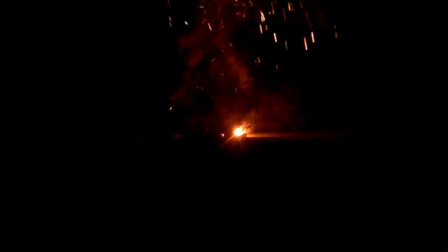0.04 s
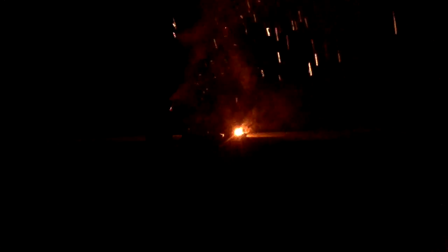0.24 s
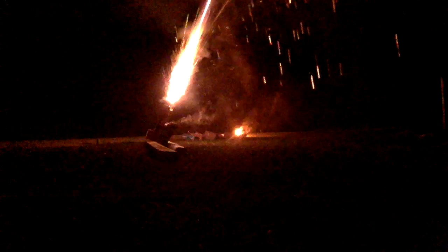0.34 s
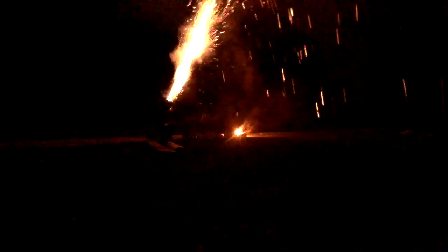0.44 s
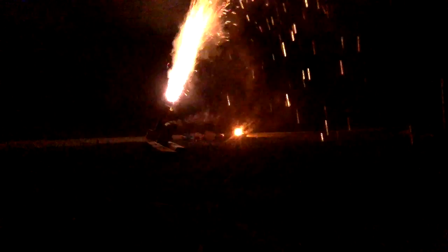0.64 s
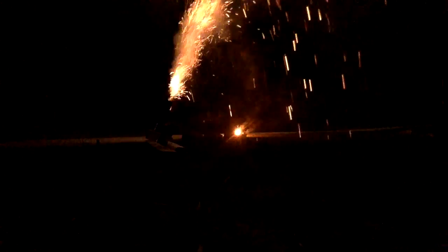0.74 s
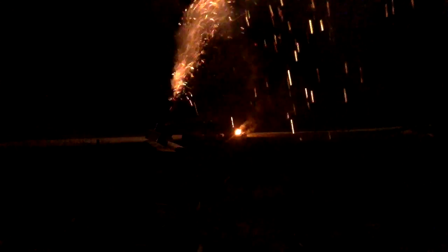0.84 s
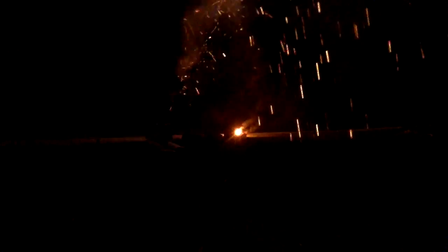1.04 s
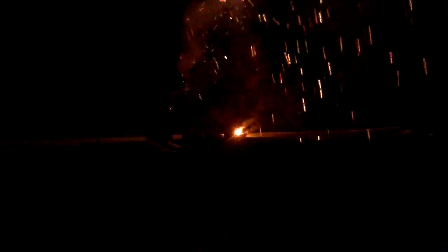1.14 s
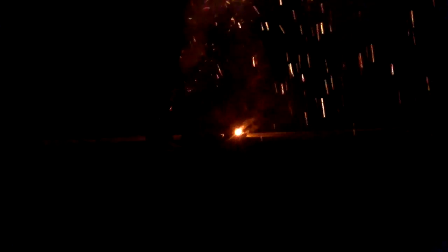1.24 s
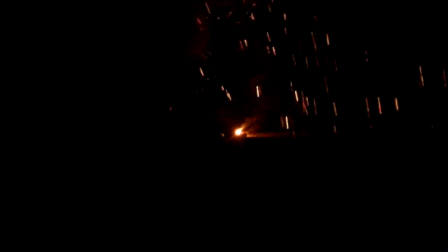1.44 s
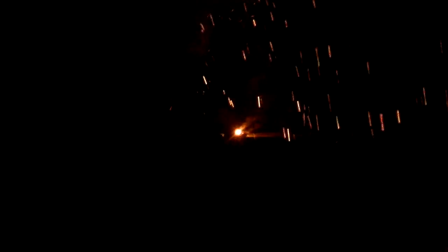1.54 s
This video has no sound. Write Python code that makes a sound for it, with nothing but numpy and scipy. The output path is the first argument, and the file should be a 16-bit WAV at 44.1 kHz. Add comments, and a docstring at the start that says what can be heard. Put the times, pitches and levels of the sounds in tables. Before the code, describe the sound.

A ground firework crackles outdoors, starting with a few sharp pops. At about 0.3 seconds a volley of cracks and a dull thump start a hissing jet of flame. Another thump comes at 0.5 seconds, a smaller one just after. The densest, loudest popping runs from 0.7 to 0.9 seconds, overloading the microphone. Lighter crackle follows from 1.1 to 1.35, and the hiss fizzles out around 1.5 seconds.

```python
"""A ground firework burns outdoors at night, its sparks bursting singly and in volleys of tiny blasts. Its tube
rings with two dull thumps and a smaller one, each with a short bark; two faint low thuds sound like distant
echoes. A jet of flame, gas noise with crackling powder grains in it, rushes up and fizzles out. The blasts
scatter from the ground and surroundings, and the loudest are flattened at full level."""
import sys
import numpy as np
from scipy import signal
from scipy.fft import rfft, irfft
from scipy.io import wavfile

SR = 44100
rng = np.random.default_rng(int(sys.argv[2]) if len(sys.argv) > 2 else 0)


def file_out(sig):
    """Save sig as 16-bit WAV at sys.argv[1]."""
    # one column per channel
    cols = np.atleast_2d(sig).T
    # limit, then scale
    lim = np.clip(cols, -1, 1)
    pcm = np.round(lim * 32767).astype(np.int16)
    wavfile.write(sys.argv[1], SR, pcm)


N = 70560
TIME = np.arange(N) / SR

# envelopes of the flame's three noise bands: t/s, roar level/dB, rush level/dB, sizzle level/dB
JET_LEVELS = [(0, -80, -79, -84), (.018, -78, -64, -76), (.032, -56, -52, -52), (0.068, -83, -58.5, -56),
              (.14, -67, -50.5, -46.5), (.18, -52, -53.5, -49), (.25, -72, -42.5, -38.5),
              (.33, -28.5, -29.5, -31), (.44, -38.5, -31.5, -35), (.61, -32.5, -35.5, -41),
              (.69, -45, -36, -37.5), (.74, -29.5, -26.5, -34.5), (.82, -35, -21.5, -28),
              (.89, -50, -20.5, -27.5), (0.979, -31.5, -22.5, -25.5), (1.1, -47, -29, -42),
              (1.16, -41, -32, -32.5), (1.28, -50, -32.5, -33), (1.38, -53, -36.5, -40.5),
              (1.443, -57, -38, -39), (1.5, -63.5, -48.5, -60), (1.6, -67, -54.5, -62)]


def from_db(db):
    """Amplitude ratio of a level in decibels."""
    return 10 ** (np.asarray(db) / 20)


def rms_one(x):
    """Normalisation to unit RMS amplitude."""
    return x / np.sqrt(np.mean(x ** 2) + 1e-20)


def cut(x, hz, kind="low", order=2):
    """Butterworth filter: attenuation beyond a corner frequency."""
    return signal.sosfilt(signal.butter(order, hz, kind, fs=SR, output="sos"), x + 1e-18)


def resonance(x, hz, width_hz):
    """Damped resonator with unit gain at its peak."""
    radius = np.exp(-np.pi * width_hz / SR)
    feedback = [1, -2 * radius * np.cos(2 * np.pi * hz / SR), radius ** 2]
    return signal.lfilter(np.array([1, 0, -1]) * (1 - radius ** 2) / 2, feedback, x + 1e-18)


def add(out, s, sound):
    """Superposition of a sound that begins at s seconds."""
    start = round(s * SR)
    out[start:start + len(sound)] += sound[:N - start]


def shaped(x, spectrum):
    """Spectral weighting, interpolated over log frequency; unit RMS."""
    hz, db = np.transpose(spectrum)
    bins = np.maximum(np.fft.rfftfreq(N, 1 / SR), 1)
    gain = from_db(np.interp(np.log(bins), np.log(hz), db))
    return rms_one(irfft(rfft(x) * gain, N))


def band_noise(hz, width_hz):
    """White noise filtered by two like resonators in cascade; unit RMS."""
    once = resonance(rng.standard_normal(N), hz, width_hz)
    return rms_one(resonance(once, hz, width_hz))


def swell(peak_s, width_s):
    """Gaussian envelope of unit height."""
    return np.exp(-0.5 * ((TIME - peak_s) / width_s) ** 2)


def scatter(x, t60, gap_s):
    """Diffuse reflection: convolution with a delayed, exponentially decaying noise of unit energy."""
    t = TIME[:len(x)]
    tail = rng.standard_normal(len(x)) * from_db(-60 * t / t60) * (t > gap_s)
    return signal.fftconvolve(x, tail / np.sqrt(np.sum(tail ** 2) + 1e-20))[:len(x)]


def blast(spike_ms):
    """Friedlander blast wave: sudden overpressure lasting spike_ms, then a longer, weaker suction."""
    t = TIME[:SR // 40]
    return np.diff(t * np.exp(-1000 * t / spike_ms), prepend=0) * SR


def burning(grains_per_s=2500, grain_db=-9, spread_db=9, flicker_db=2.07, flicker_hz=63):
    """Combustion noise: gas noise plus the shot noise of powder grains, randomly amplitude-modulated."""
    grains = (rng.random(N) < grains_per_s / SR) * rng.choice([-1, 1], N)
    sizes = from_db(spread_db * np.minimum(rng.exponential(1, N), 5))
    noise = rng.standard_normal(N) + from_db(grain_db) * rms_one(grains * sizes)
    flicker = rms_one(cut(rng.standard_normal(2 * N), flicker_hz)[N:])
    return noise * from_db(flicker_db * flicker)


def jet():
    """Jet noise: the flame roars, rushes and sizzles in three bands, and spits once before it builds."""
    # relative spectral densities of the bass, middle and treble bands: f/Hz, level/dB
    roar_spectrum = [(30, -23.5), (100, -10), (200, -6), (320, 2.5), (520, -9.5), (800, -20), (1500, -40)]
    rush_spectrum = [(300, -30), (600, -4.5), (900, -4), (1350, -0.5), (2200, -5), (3000, -3.5), (4800, -4),
                     (6300, -3.5), (9000, -18), (15000, -44.5)]
    sizzle_spectrum = [(2500, -66), (5000, -14), (6500, -2.5), (7500, 2.5), (9500, -3), (12000, -9.5),
                       (15500, -17)]
    bands = [shaped(burning(), spectrum) for spectrum in (roar_spectrum, rush_spectrum, sizzle_spectrum)]
    s, *levels = np.transpose(JET_LEVELS)
    flame = sum(from_db(np.interp(TIME, s, db)) * band for db, band in zip(levels, bands))
    roar, rush, sizzle = bands
    spit = from_db(-51) * roar + from_db(-42) * rush + from_db(-35.5) * sizzle
    return flame + swell(peak_s=0.092, width_s=0.0069) * spit


def specks(per_s=130, above_sizzle_db=2.5, spread_db=7):
    """Poisson process: tiny sparks tick at random, louder as the jet sizzles more."""
    s, _, _, sizzle_db = np.transpose(JET_LEVELS)
    sizes = from_db(np.interp(TIME, s, sizzle_db) + above_sizzle_db + spread_db * rng.standard_normal(N))
    ticks = sizes * (rng.random(N) < per_s / SR)
    return signal.fftconvolve(ticks, blast(spike_ms=0.034))[:N]


def sparks(jitter_s=0.00005, ground_lag_s=0.00066, lag_spread=0.2, heavy_ms=0.07, heavy_range_ms=0.0045):
    """Interference: each spark's blast meets its ground reflection, with a delay set by its place."""
    # bursting sparks: t/s, level/dB, duration of the overpressure/ms
    bursts = [(0.0266, -5, 0.067), (0.1333, 9.5, 0.046), (0.213, 5.5, 0.033), (0.2193, 7.5, 0.046),
              (0.2342, -8, 0.053), (0.25, 10, 0.023), (0.2532, 6.5, 0.063), (0.258, 5, 0.041),
              (0.2723, 10, 0.047), (0.277, 18, 0.027), (0.2778, 7.5, 0.062), (0.2799, 12, 0.037),
              (0.2837, 12.5, 0.03), (0.2863, -2, 0.061), (0.2862, 20, 0.064), (0.2879, 9.5, 0.08),
              (0.2954, 14.5, 0.072), (0.3242, 1.5, 0.039), (0.344, -3, 0.036), (0.3471, -3, 0.026),
              (0.3501, 6.0, 0.039), (0.3562, 4, 0.053), (0.3778, 3, 0.053), (0.3816, 6.5, 0.05),
              (0.4034, 7, 0.056), (0.4084, 4, 0.041), (0.4629, -4, 0.035), (0.4709, 5, 0.041),
              (0.4808, 14, 0.045), (0.4923, -11, 0.062), (0.5875, 19, 0.025), (0.6336, 13.5, 0.075),
              (0.6481, 14, 0.062), (0.6546, 11.5, 0.097), (0.6612, 14.5, 0.074), (0.7052, 11.5, 0.08),
              (0.7128, 14, 0.08), (0.7148, 13.5, 0.084), (0.7177, 23.5, 0.069), (0.7188, 4, 0.089),
              (0.7345, 16, 0.075), (0.7366, 12.5, 0.076), (0.7385, 17.5, 0.077), (0.7433, 13, 0.076),
              (0.7467, 16.5, 0.074), (0.7525, 16, 0.061), (0.7574, 4, 0.08), (0.7595, 15.5, 0.086),
              (0.7639, 15, 0.1), (0.7679, 20.5, 0.047), (0.7697, 20.5, 0.068), (0.7771, 16.5, 0.075),
              (0.7793, 28, 0.043), (0.7801, 14, 0.057), (0.7804, 17, 0.061), (0.7809, 20, 0.11),
              (0.7827, 17, 0.094), (0.7899, 17, 0.068), (0.797, 11, 0.1), (0.8077, 19.5, 0.056),
              (0.808, 11, 0.09), (0.8102, 14, 0.094), (0.8143, 11, 0.11), (0.8327, 23, 0.067),
              (0.8339, 6, 0.098), (0.8429, 14.5, 0.08), (0.8545, 15, 0.075), (0.8597, 15, 0.077),
              (0.8605, 21, 0.084), (0.8723, 6.5, 0.12), (0.8735, 16, 0.08), (0.8905, 14, 0.09),
              (0.8974, 13.5, 0.083), (0.9103, 12.5, 0.094), (0.9181, 15.5, 0.085), (1.0356, 1, 0.043),
              (1.0584, 11, 0.021), (1.0638, -9, 0.05), (1.081, 6, 0.053), (1.084, 5.5, 0.018),
              (1.1134, -12, 0.094), (1.1176, 4, 0.044), (1.1255, 4, 0.071), (1.1269, 3, 0.047),
              (1.1348, 1.5, 0.057), (1.1378, -4.5, 0.1), (1.1418, -3.5, 0.062), (1.1462, 8.5, 0.09),
              (1.1588, 5.5, 0.097), (1.1646, 6, 0.031), (1.1677, 6.5, 0.064), (1.1711, 8, 0.033),
              (1.1732, 9, 0.034), (1.174, 0, 0.048), (1.1758, 2.5, 0.058), (1.1803, 4.5, 0.072),
              (1.1849, 4.5, 0.057), (1.1926, -7, 0.04), (1.202, 6, 0.041), (1.2055, -8, 0.044),
              (1.2081, -4, 0.027), (1.21, -15, 0.038), (1.214, -5.5, 0.088), (1.2243, 9, 0.033),
              (1.2271, 1.0, 0.024), (1.2328, 6, 0.024), (1.2467, -8, 0.052), (1.2508, 1.5, 0.057),
              (1.2547, 3.5, 0.024), (1.2612, 7, 0.069), (1.2728, 4.0, 0.052), (1.2877, 3.0, 0.038),
              (1.2997, 4.5, 0.051), (1.3153, -11, 0.041), (1.3224, 8, 0.073), (1.3341, 2, 0.068),
              (1.343, 8.5, 0.073), (1.4146, 5.5, 0.05)]
    # resonances that colour a blast at the microphone: f/Hz, bandwidth/Hz, gain
    colour = [(281, 237, 3), (954, 395, 0.5), (1313, 1350, 0.41), (2670, 2300, 0.0565), (7355, 1980, 2),
              (9290, 3800, 1.4)]
    direct, bounce, heavy = specks(), np.zeros(N), np.zeros(N)
    for (s, db, spike_ms), (height, late) in zip(bursts, rng.standard_normal((len(bursts), 2))):
        s += jitter_s * late
        wave = from_db(db) * blast(spike_ms)
        ground_scatter = from_db(-18) * scatter(wave, t60=0.019, gap_s=0.00044)
        add(direct, s, wave + ground_scatter)
        add(bounce, s + ground_lag_s * np.exp(lag_spread * height), wave)
        # heavy, long blasts come out of the jet and ring at its mouth
        heaviness = 0.5 * (1 + np.tanh((spike_ms - heavy_ms) / heavy_range_ms))
        add(heavy, s, heaviness * wave)
    arriving = direct + 0.31 * cut(bounce, hz=4100, order=1)
    coloured = arriving + sum(gain * resonance(arriving, hz, width) for hz, width, gain in colour)
    near = coloured + resonance(heavy, hz=2867, width_hz=520)
    far_echoes = cut(scatter(near, t60=0.24, gap_s=0.0014), hz=6000)
    return near + from_db(-29.5) * far_echoes


def thumps(overtone_hz=516, overtone_db=-16, hot_rise=0.35, cooling_s=0.0012):
    """Air-column resonance: a thump is a blast and a few damped cycles of the air in the tube."""
    # two dull thumps, a smaller one, and two faint low thuds like distant echoes:
    # t/s, ring level/dB, settled f/Hz, ring t60/s, blast level/dB
    thumps_and_thuds = [(.2885, 10.5, 262, 0.017, 19.5), (.391, -17, 124, .04, -26),
                        (0.5084, 10, 285, 0.013, 17.5), (.5882, -4.5, 147.6, .018, -2.5),
                        (0.967, -28, 127, 0.046, -35)]
    # the pitch starts higher by the fraction hot_rise while the gas is hot
    warped_time = TIME + hot_rise * cooling_s * (1 - np.exp(-TIME / cooling_s))
    # a short mid-pitched bark follows each thump, then a weaker, longer tail
    bark_envelope = from_db(-17 - 60 * TIME / 0.011) + from_db(-35 - 60 * TIME / 0.088)
    bodies, barks = np.zeros(N), np.zeros(N)
    for s, ring_db, hz, t60, blast_db in thumps_and_thuds:
        fundamental = np.sin(2 * np.pi * hz * warped_time)
        overtone = from_db(overtone_db) * np.sin(2 * np.pi * overtone_hz * warped_time)
        add(bodies, s, -from_db(ring_db - 60 * TIME / t60) * (fundamental + overtone))
        wave = from_db(blast_db) * blast(spike_ms=0.09)
        ragged_edge = from_db(-6) * scatter(wave, t60=0.01, gap_s=0.0002)
        add(bodies, s, wave + ragged_edge)
        add(barks, s, from_db(blast_db) * bark_envelope * band_noise(hz=1350, width_hz=930))
    echoes = cut(scatter(bodies, t60=0.095, gap_s=0.0036), hz=1900)
    return bodies + barks + from_db(-11.5) * echoes


def last_fizz():
    """Band-limited noise: a hiss swells and fades as the last powder burns out."""
    return from_db(-41) * swell(peak_s=1.444, width_s=0.045) * band_noise(hz=4170, width_hz=2800)


def scene():
    """Superposition of sparks, thumps and flame at one microphone."""
    return (sparks() + thumps() + jet() + last_fizz())[None]


def record(dry, low_cut_hz=174, clip_level=0.96, high_cut_hz=16000):
    """Hard limiting: after a bass cut the loudest blasts are flattened at a fixed level, and a steep low-pass
    limits the bandwidth."""
    clipped = np.clip(cut(dry, low_cut_hz, "high", order=1), -clip_level, clip_level)
    return signal.sosfiltfilt(signal.ellip(8, 0.05, 50, high_cut_hz, fs=SR, output="sos"), clipped)


dry = scene()
out = record(dry)
file_out(out)
```